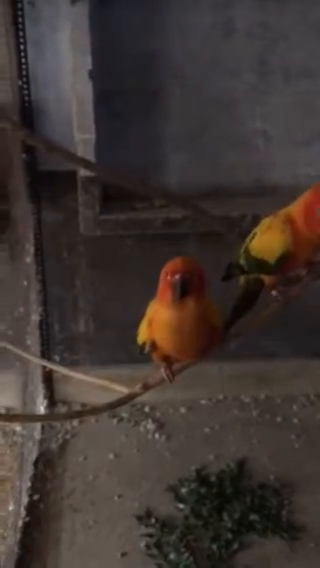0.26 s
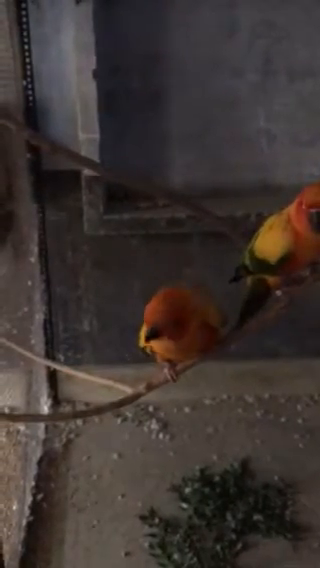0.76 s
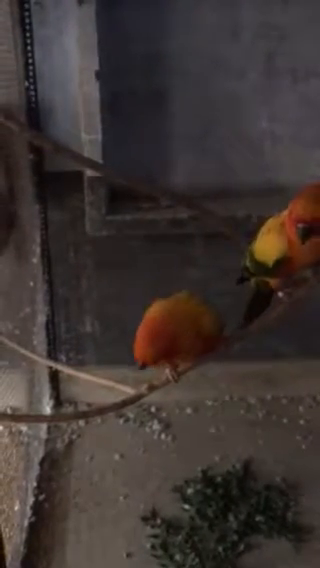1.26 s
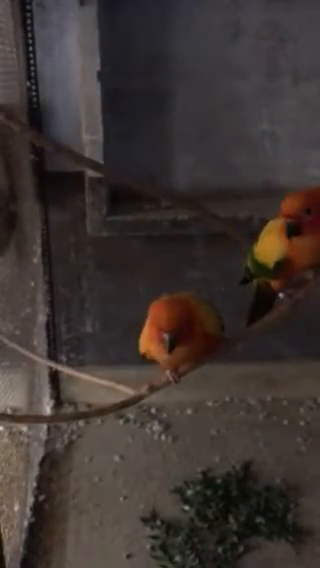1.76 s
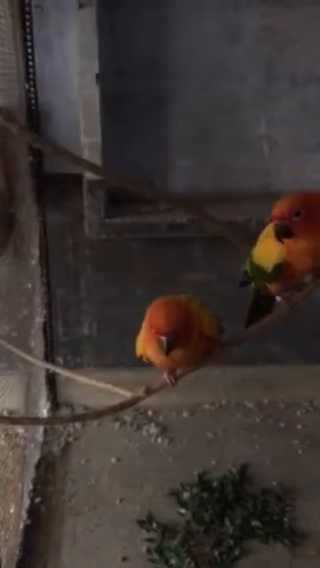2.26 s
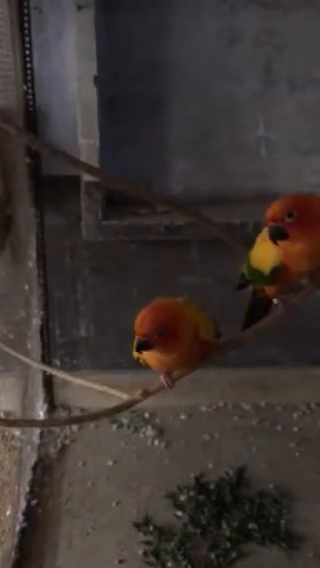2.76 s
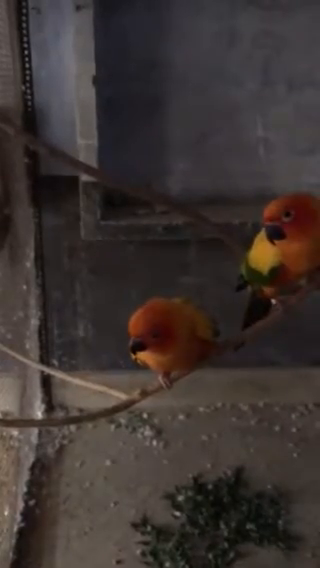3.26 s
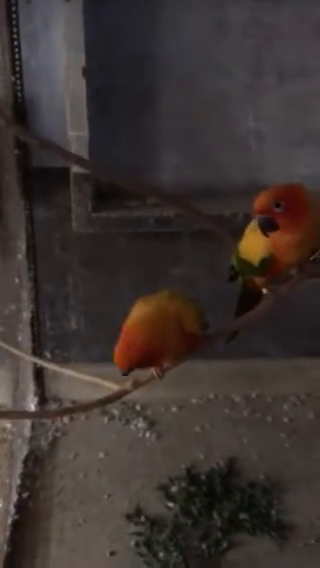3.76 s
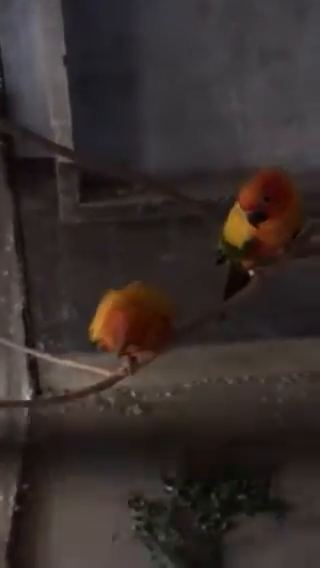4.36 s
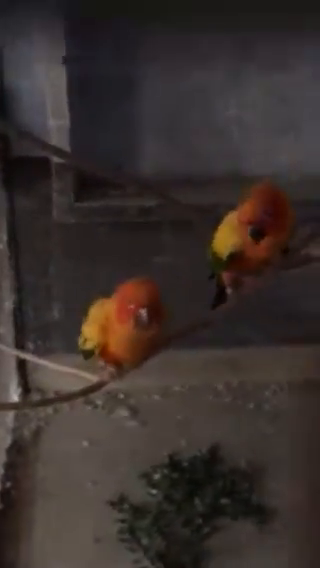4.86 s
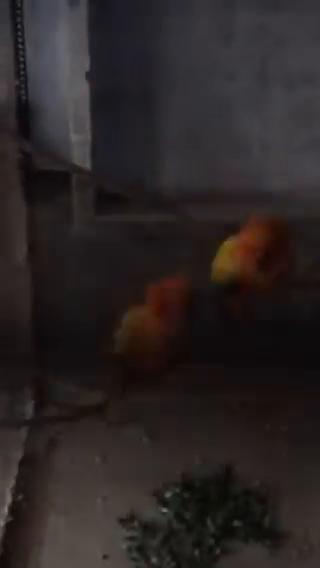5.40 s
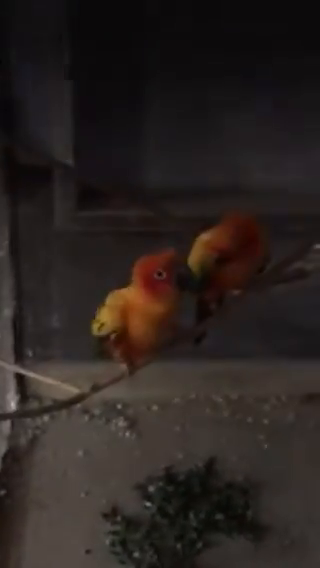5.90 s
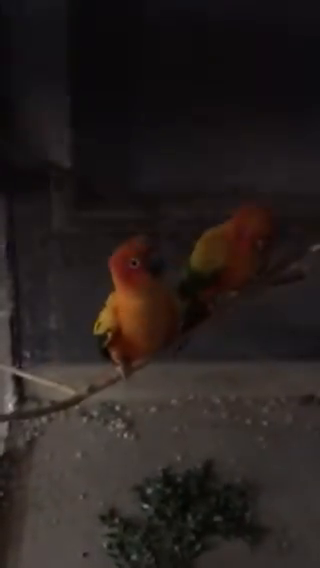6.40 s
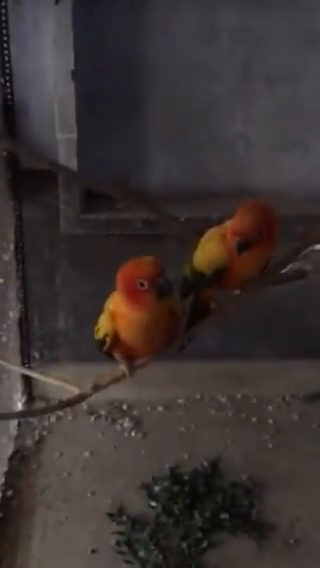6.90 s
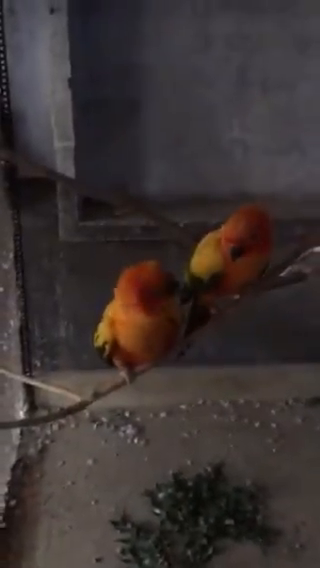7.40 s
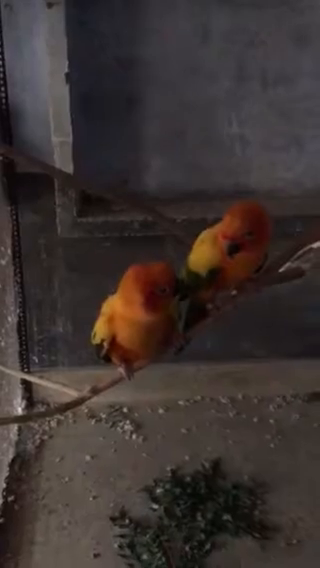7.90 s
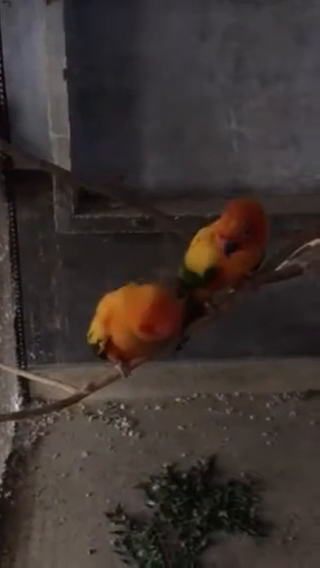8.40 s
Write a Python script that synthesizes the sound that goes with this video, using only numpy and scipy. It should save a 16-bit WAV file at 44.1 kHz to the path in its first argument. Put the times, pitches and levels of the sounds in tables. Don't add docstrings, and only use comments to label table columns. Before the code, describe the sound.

Raspy parrot calls, yelps and chirps burst one after another in a hard-walled indoor cage, with a sharp beak snap and soft ventilation underneath.

```python
import sys
import numpy as np
from scipy import signal
from scipy.fft import rfft, irfft
from scipy.io import wavfile

SR = 44100
rng = np.random.default_rng(int(sys.argv[2]) if len(sys.argv) > 2 else 0)


def persist_wave(psi):
    counts = np.round(np.clip(psi, -1, 1) * 32767).astype(np.int16)
    wavfile.write(sys.argv[1], SR, np.atleast_2d(counts).T)


def boost_factor(decibels):
    exponent = np.asarray(decibels, float) / 20
    return 10 ** exponent


N = 381465


def rms_one(x):
    return x / np.sqrt(np.mean(x ** 2) + 1e-20)


def at_hz(points, hz):
    f, value = np.transpose(points)
    return np.interp(np.log(hz), np.log(f), value)


def colour(x, points):
    hz = np.maximum(np.arange(N // 2 + 1) * SR / N, 1)
    return irfft(rfft(x) * boost_factor(at_hz(points, hz)), N)


def fader(rows):
    return boost_factor(np.interp(np.arange(N) / SR, *np.transpose(rows)))


def peak(hz, centre_hz, width_hz):
    return 1 / (1 + (2 * (hz - centre_hz) / width_hz) ** 2)


def butter(x, order, hz, kind):
    return signal.sosfilt(signal.butter(order, hz, kind, fs=SR, output="sos"), x)


def wobble(size, top_hz):
    warm_up = 4000
    return rms_one(butter(rng.standard_normal(size + warm_up), 4, top_hz, "low")[warm_up:])


def unroll(rows):
    s, *columns = np.transpose(rows)
    t = np.arange(s[0], s[-1], 1 / SR)
    edge = np.clip(np.minimum(t - s[0], s[-1] - t) / 0.0021, 0, 1)
    return round(s[0] * SR), edge, [np.interp(t, s, c) for c in columns]


def add(track, start, sound):
    track[start:start + len(sound)] += sound


# f/Hz, level/dB (per Hz)
AIR_TONE = [(35, -21), (60, -14), (98, 1), (130, -10.5), (156, -9), (222, -13.5), (330, -13.5),
            (862, -22.5), (1310, -25), (2650, -30), (3190, -35), (3940, -35.5), (4530, -38), (12400, -49),
            (16000, -53)]
# t/s, level/dB
AIR_LEVEL = [(0.0, -46.5), (5.0, -47), (5.5, -47.5), (6.4, -46.5), (6.9, -43), (7.4, -48.5), (8.65, -47.5)]


def fan_air():
    broad = rms_one(colour(rng.standard_normal(N), AIR_TONE))
    treble = butter(broad, 2, 4000, "high")
    restless = boost_factor(2 * wobble(N, top_hz=9)) - 1
    return fader(AIR_LEVEL) * (broad + treble * restless)


# t/s, level/dB
TRAFFIC = [(0.0, -52.5), (2.2, -53), (3.2, -68), (4.2, -67), (5.0, -62), (6.6, -70), (8.0, -63),
           (8.65, -54)]


def traffic_rumble():
    return fader(TRAFFIC) * rms_one(butter(rng.standard_normal(N), 2, [38, 65], "band"))


# f/Hz, width/Hz, level/dB (against the load)
HUM_BANDS = [(103.9, 4.1, -7.5), (202.5, 7.9, -12)]
# t/s, level/dB
MOTOR_LOAD = [(0.0, -47), (1.6, -48.5), (2.8, -48), (5.2, -49.5), (5.5, -46), (7.5, -53), (7.9, -54),
              (8.65, -45)]


def motor_hum():
    out = np.zeros(N)
    hz = np.arange(N // 2 + 1) * SR / N
    for centre_hz, width_hz, db in HUM_BANDS:
        band = irfft(rfft(rng.standard_normal(N)) * peak(hz, centre_hz, width_hz), N)
        out += fader(MOTOR_LOAD) * boost_factor(db) * rms_one(band)
    return out


# f/Hz, t60/s
WALLS = [(500, 1), (2500, 1.0), (5000, 0.79), (9000, 0.48), (15000, 0.39)]


def aviary(x):
    t = np.arange(round(1.3 * SR)) / SR
    white = rng.standard_normal((2, len(t)))
    edges = 400 * 2 ** np.arange(0, 6, .5)
    echo = 0
    for k, (low, high) in enumerate(zip(edges, edges[1:])):
        band = butter(white[k % 2], 2, [low, high], "band")
        t60 = at_hz(WALLS, np.sqrt(low * high))
        near_walls = boost_factor(7 - 60 * t / (0.16 * t60))
        echo = echo + band * (boost_factor(-60 * t / t60) + near_walls)
    echo = echo * np.clip(t / 0.0087, 0, 1)
    return signal.fftconvolve(x, echo / np.sqrt(np.sum(echo ** 2)))[:N]


# f/Hz, level/dB
PATH = [(300, -5), (1500, -5.5), (6600, 1), (7200, -3.5), (7800, -5.5), (9000, -4.5), (10100, -5.5),
        (10650, -9.5), (11500, -2.5), (14000, -7), (15500, -16), (20000, -26)]


def cage_and_microphone(x):
    return colour(x, PATH)


# t/s, peak level/dB, ring f/Hz, t60/s
CLICKS = [
    (2.755, -16, 6300, 0.012),
    (2.759, -6, 5640, 0.0022),
    (1.2, -45, 9000, 0.0091),
]
# t/s, length/s, level/dB
HISS_BURSTS = [(2.754, 0.0083, -27.5), (5.9, 0.063, -55), (0.444, 0.036, -58), (.68, 0.051, -60),
               (0.806, 0.023, -56), (0.915, 0.027, -60), (1.092, 0.15, -54), (2.325, .04, -61),
               (4.636, 0.033, -71), (4.775, 0.032, -55), (5.098, .06, -81), (5.228, 0.015, -80),
               (5.34, .02, -73), (6.617, 0.036, -53), (6.747, 0.029, -55), (6.86, 0.0072, -56),
               (8.512, 0.014, -45), (8.53, 0.023, -75), (8.612, .01, -75)]


def perch_noises():
    out, t = np.zeros(N), np.arange(900) / SR
    for s, peak_db, hz, t60 in CLICKS:
        decay = boost_factor(peak_db - 60 * t / t60) * np.clip(t / 0.000097, 0, 1)
        add(out, round(s * SR), decay * np.sin(2 * np.pi * hz * t))
    for s, length, level_db in HISS_BURSTS:
        size = round(length * SR)
        hiss = np.diff(rng.standard_normal(size + 1))
        add(out, round(s * SR), boost_factor(level_db) * np.hanning(size) * hiss)
    return out


def stack(pitch_hz, partials_db):
    phase = 2 * np.pi * np.cumsum(pitch_hz) / SR
    return sum(boost_factor(db) * np.sin((k + 1) * phase) for k, db in enumerate(partials_db))


# t/s, length/s, peak level/dB, f/Hz
TRILL = [
    (5.907, 0.0064, -26.5, 1270),
    (5.916, 0.009, -19, 1127),
    (5.935, 0.0064, -13.5, 1158),
    (5.952, 0.0074, -16, 1195),
    (5.966, 0.017, -19, 1120),
]
TRILL_PARTIALS_DB = [1, 3.5, -3.5, -7, -17.5, -32, -18, -38]


def trill():
    out = np.zeros(N)
    for s, length, peak_db, hz in TRILL:
        u = np.linspace(0, 1, round(length * SR))
        pitch_hz = hz * (1 + 0.067 * wobble(len(u), top_hz=410))
        gate = np.clip(np.minimum(u * length / .0004, (1 - u) / .25), 0, 1)
        shape = boost_factor(peak_db - 9 - 3 * u) * gate
        add(out, round(s * SR), shape * stack(pitch_hz, TRILL_PARTIALS_DB))
    return out


# t/s, level/dB, f/Hz
WHISTLES = [
    [(4.27, -47.5, 1990), (4.326, -33, 2493), (4.332, -38, 2556), (4.388, -44.5, 2775),
     (4.408, -34.5, 2834), (4.46, -81, 2970)],
    [(7.22, -40.5, 2170), (7.244, -35.5, 2352), (7.324, -34, 2864), (7.36, -35.5, 2998), (7.4, -50, 2900),
     (7.41, -26, 2770)],
]
WHISTLE_PARTIALS_DB = [4, -11.5, -14, -32, -15]


def whistles():
    out = np.zeros(N)
    for rows in WHISTLES:
        start, edge, (level_db, pitch_hz) = unroll(rows)
        closed_db = -170 * (1 - pitch_hz / pitch_hz.max())
        partials_db = [db + closed_db * (k > 0) for k, db in enumerate(WHISTLE_PARTIALS_DB)]
        flutter = 1 + 0.007 * wobble(len(pitch_hz), top_hz=154)
        add(out, start, edge * boost_factor(level_db + 11) * stack(pitch_hz * flutter, partials_db))
    return out


def squawk(pitch_hz, beak_hz, width_hz, chaos, half_db, first_db, upper_db, lowest_db):
    size = len(pitch_hz)
    unsteady = 1 + .06 * chaos ** 2 * wobble(size, top_hz=70)
    phase = 2 * np.pi * np.cumsum(pitch_hz * unsteady) / SR
    tremble = (.35 + chaos) * wobble(size, top_hz=450)
    out = 0
    for k in np.arange(1, 9, .5):
        hz = k * pitch_hz
        beak = peak(hz, beak_hz, width_hz)
        throat = peak(hz, centre_hz=9630, width_hz=1840)
        steady = beak + boost_factor(upper_db + 2) * throat
        rasp = beak + boost_factor(upper_db - (6.0 - 11.4 * chaos) * np.log2(hz / 9000))
        if k == 1:
            steady = rasp = boost_factor(first_db)
        angle = k * phase + rng.uniform(0, 2 * np.pi)
        ordered = np.sqrt(1 - chaos) * steady * np.sin(angle)
        chaotic = np.sqrt(chaos) * rasp * np.sin(angle + (k + 1) ** .5 * tremble)
        flare_db = 7 * chaos * wobble(size, top_hz=40)
        gain = boost_factor(half_db * (k % 1 > 0) + flare_db) * (hz < .4 * SR)
        out = out + gain * (ordered + chaotic)
    out = out * boost_factor(3.5 * chaos * wobble(size, top_hz=250))
    above_windpipe = butter(out, 6, .9 * pitch_hz.min(), "high")
    lowest = boost_factor(lowest_db) * np.sin(phase / 2 + 1.4 * chaos * wobble(size, top_hz=185))
    return rms_one(above_windpipe + lowest)


# t/s, length/s, level/dB, first f/Hz, last f/Hz
SCREECHES = [
    (5.521, .065, -25.5, 2400, 1962),
    (6.35, 0.047, -23, 2413, 2198),
]
CRIES = [
    (4.15, 0.0755, -22, 2690, 2573),
    (4.225, 0.068, -25, 2600, 2860),
]
FULL_NOTES = [
    (1.635, 0.047, -23.5, 2147, 2137),
    (3.462, 0.02, -37, 2103, 2130),
]
SHRIEKS = [
    (1.3, 0.041, -20, 2465, 2952),
    (7.015, 0.041, -20.5, 2700, 2664),
    (7.085, 0.037, -22, 2698, 2670),
    (7.415, 0.0726, -19.5, 2600, 2660),
    (7.488, 0.059, -24.5, 2654, 2600),
    (7.55, 0.062, -24.5, 2680, 2906),
]
RASPS = [
    (2.035, 0.033, -24, 2400, 2047),
    (3.052, 0.076, -24, 2400, 2234),
    (3.13, 0.047, -25, 2474, 2350),
]
YELPS = [
    (2.82, 0.048, -24.5, 2133, 2000),
    (3.33, 0.029, -34, 2040, 1974),
    (5.555, 0.0444, -30, 2012, 1780),
]
BARKS = [
    (3.79, 0.065, -29, 2370, 2700),
    (3.845, .09, -27.5, 2623, 2452),
]
FAR_SQUAWKS = [
    (.165, 0.059, -42, 1959, 1890),
    (.58, 0.053, -42.5, 2144, 2010),
    (6.06, 0.0587, -39.5, 2145, 2048),
    (6.19, .05, -41, 2200, 2080),
]
CHATTER = [
    (6.42, 0.048, -37.5, 1754, 1467),
    (6.55, 0.059, -38, 1294, 1693),
    (6.65, 0.088, -35, 1862, 1567),
    (6.805, 0.0603, -38.5, 1537, 1370),
    (6.9, 0.069, -35, 1918, 1600),
]
PEEPS = [
    (5.49, .03, -31, 3660, 2970),
    (7.97, .035, -34.5, 3980, 3920),
]
CHIRPS = [
    (3.03, .025, -33, 2333, 2400),
    (5.37, 0.053, -24, 2426, 2367),
]
CLEAR_NOTES = [
    (1.686, 0.082, -24.5, 2530, 2487),
    (7.625, .1, -27.5, 2060, 2342),
]
CROAKS = [
    (0.0, 0.019, -36, 2857, 2870),
    (8.02, 0.082, -27.5, 2727, 2492),
]
# calls, then partial levels and direct share/dB, beak tuning/multiple of pitch;
# the level swells by rise_db/dB up to crest/share of the call, then sinks by fade_db/dB
MANNERS = [ (SCREECHES, dict(half_db=5, first_db=-4.5, upper_db=-10, lowest_db=-35, direct_db=-2.5, beak_times=2.48, rise_db=2, crest=0.38, fade_db=15.5)),
           (RASPS, dict(half_db=-4.5, first_db=1, upper_db=-1.5, lowest_db=-22.5, direct_db=-5, beak_times=1.81, rise_db=4.5, crest=0.26, fade_db=8.5)),
           (YELPS, dict(half_db=-9, first_db=1, upper_db=-6, lowest_db=-23, direct_db=-2, beak_times=2.33, rise_db=7, crest=0.38, fade_db=15.5)),
           (FAR_SQUAWKS, dict(half_db=-4.5, first_db=4.5, upper_db=-36, lowest_db=3, direct_db=-20, beak_times=1.48, rise_db=3, crest=.3, fade_db=5)),
           (CHATTER, dict(half_db=-43, first_db=-4, upper_db=-31, lowest_db=-31, direct_db=-0.5, beak_times=2.23, rise_db=10, crest=0.39, fade_db=6)),
           (PEEPS, dict(half_db=-26, first_db=-2, upper_db=-27, lowest_db=-30, direct_db=-3, beak_times=1.5, rise_db=14.5, crest=0.69, fade_db=13)),
           (CLEAR_NOTES, dict(half_db=-6, first_db=-19, upper_db=-6.5, lowest_db=-39, direct_db=-10, beak_times=2.22, rise_db=2, crest=0.11, fade_db=11.5)),
           (CROAKS, dict(half_db=-1, first_db=-5, upper_db=-13.5, lowest_db=-13, direct_db=0, beak_times=1.58, rise_db=2.5, crest=0.3, fade_db=5)),
           (SHRIEKS, dict(half_db=-1.5, first_db=-6, upper_db=-7.5, lowest_db=-53, direct_db=-1.5, beak_times=2.054, rise_db=9.5, crest=0.52, fade_db=4)),
           (CHIRPS, dict(half_db=-21, first_db=-3, upper_db=-7, lowest_db=-44, direct_db=-3, beak_times=2.22, rise_db=13.5, crest=0.46, fade_db=6.5)),
           (BARKS, dict(half_db=-12.5, first_db=-1.5, upper_db=-10, lowest_db=-24, direct_db=-4, beak_times=2.28, rise_db=9, crest=0.31, fade_db=1)),
           (FULL_NOTES, dict(half_db=-3.5, first_db=-1.5, upper_db=2, lowest_db=-22, direct_db=-5.5, beak_times=2.17, rise_db=7, crest=0.64, fade_db=-0.5)),
           (CRIES, dict(half_db=-5, first_db=0, upper_db=-3, lowest_db=-20.5, direct_db=-3.5, beak_times=1.58, rise_db=5.5, crest=0.73, fade_db=13)),
           ]
BEAK_WIDTHS_HZ = [2600, 2600, 1800, 1570, 1790, 1200, 990, 1600, 2400, 1810, 1480, 2600, 2700]
DISORDER = [.68, .8, .7, .9, .27, .35, .22, .4, .7, .35, .65, .35, .55]


def calls():
    sent, direct = np.zeros((2, N))
    for (rows, v), chaos, width_hz in zip(MANNERS, DISORDER, BEAK_WIDTHS_HZ):
        crest = np.clip(v["crest"], .05, .95)
        for s, length, db, first_hz, last_hz in rows:
            crest_hz = first_hz + crest * (last_hz - first_hz)
            shape = [(s, db - v["rise_db"], first_hz),
                     (s + crest * length, db, crest_hz),
                     (s + length, db - v["fade_db"], last_hz)]
            start, edge, (level_db, pitch_hz) = unroll(shape)
            beak_hz = v["beak_times"] * pitch_hz.mean()
            upper_db = v["upper_db"] + 0.77 * (level_db - db)
            voice = squawk(pitch_hz, beak_hz, width_hz, chaos, v["half_db"], v["first_db"],
                           upper_db, v["lowest_db"])
            sound = edge * boost_factor(level_db) * voice
            add(sent, start, sound)
            add(direct, start, boost_factor(v["direct_db"]) * sound)
    return sent, direct


def scene():
    background = fan_air() + traffic_rumble() + motor_hum()
    small, close, pure = perch_noises(), trill(), whistles()
    sent, direct = calls()
    wet = aviary(sent + pure + boost_factor(-8.5) * close + boost_factor(-1.0) * small)
    straight = direct + boost_factor(-8) * pure + close + small
    return (cage_and_microphone(wet + straight) + background)[None]


def low_pass(x):
    return signal.sosfilt(signal.butter(12, 16570, fs=SR, output="sos"), x)


def record(dry):
    rounded = .5 * np.tanh(dry / .5)
    top_cut = signal.cheby2(12, 60, 16300, fs=SR, output="sos")
    return low_pass(signal.sosfilt(top_cut, rounded))


dry = scene()
out = record(dry)
persist_wave(out)
```